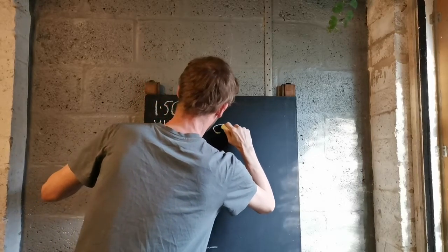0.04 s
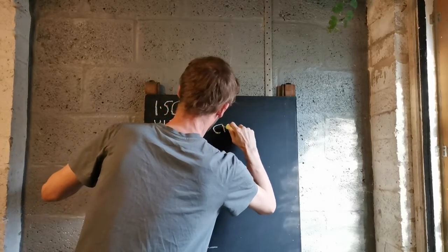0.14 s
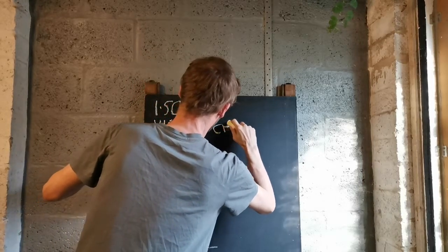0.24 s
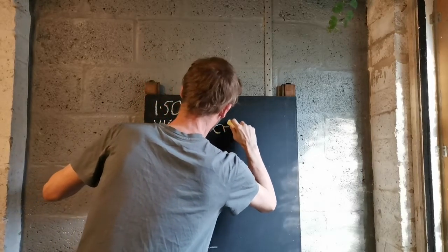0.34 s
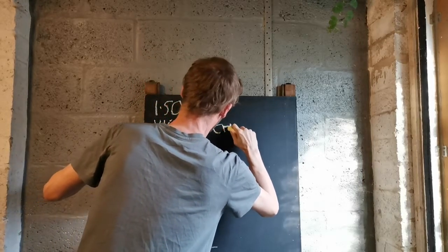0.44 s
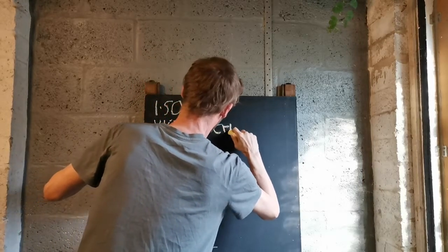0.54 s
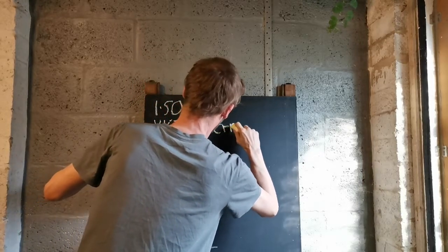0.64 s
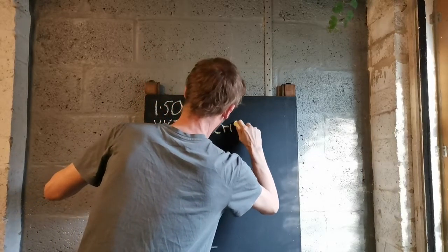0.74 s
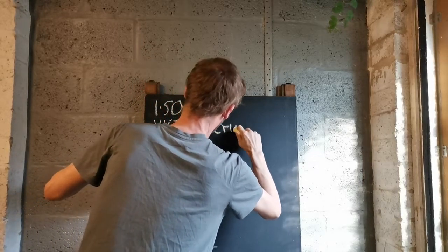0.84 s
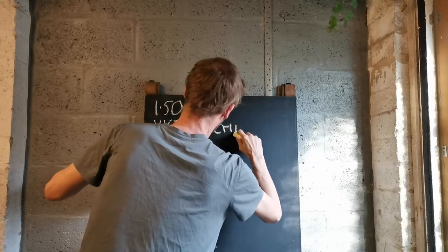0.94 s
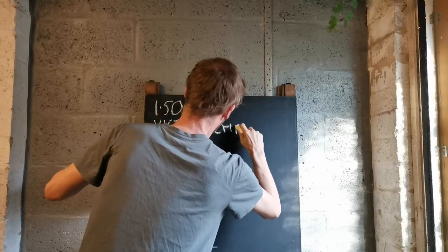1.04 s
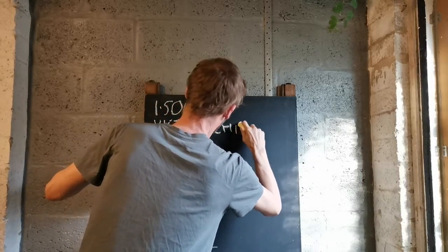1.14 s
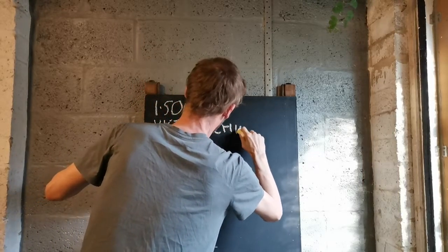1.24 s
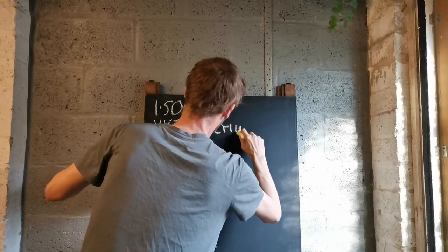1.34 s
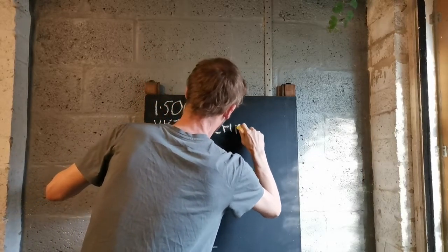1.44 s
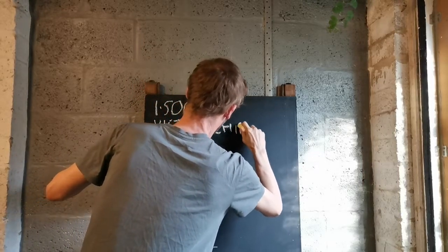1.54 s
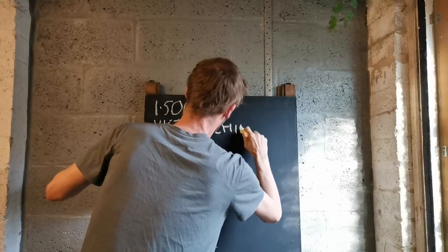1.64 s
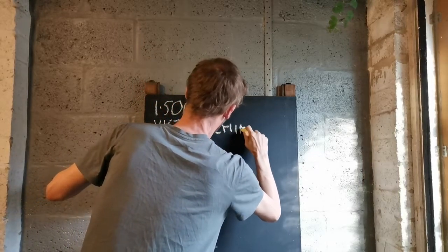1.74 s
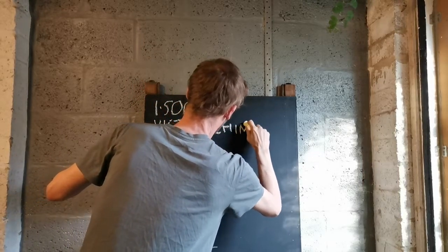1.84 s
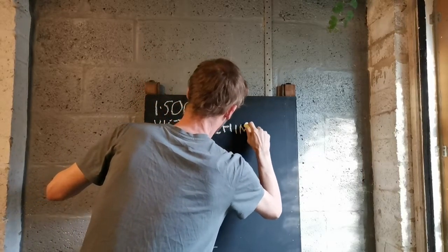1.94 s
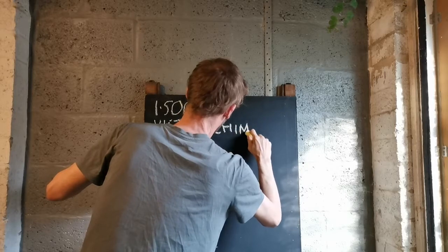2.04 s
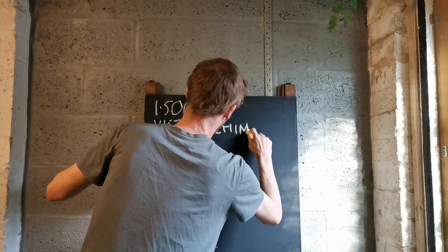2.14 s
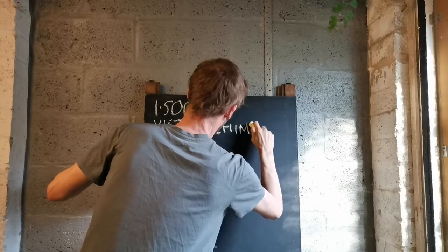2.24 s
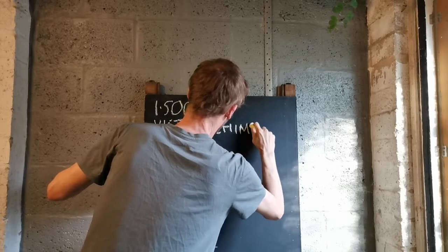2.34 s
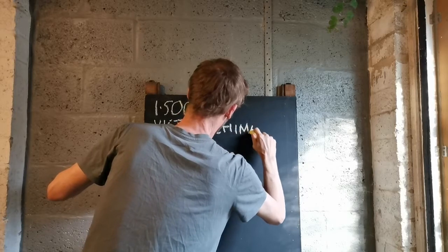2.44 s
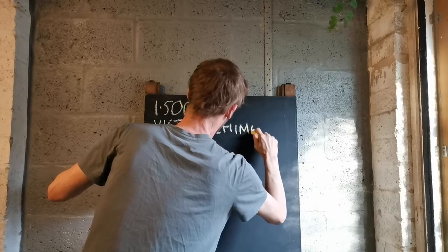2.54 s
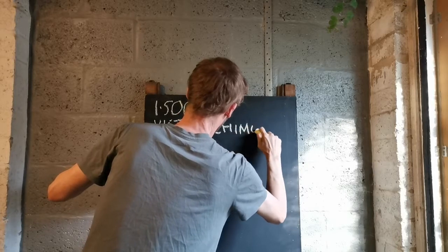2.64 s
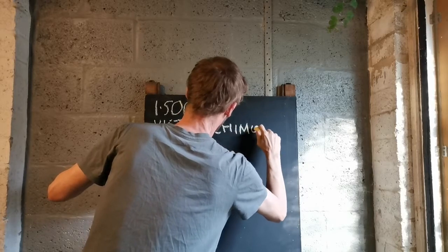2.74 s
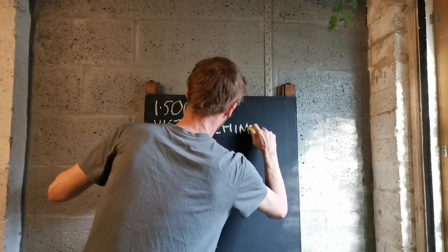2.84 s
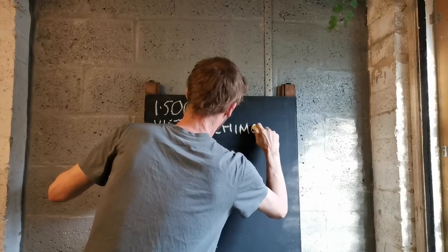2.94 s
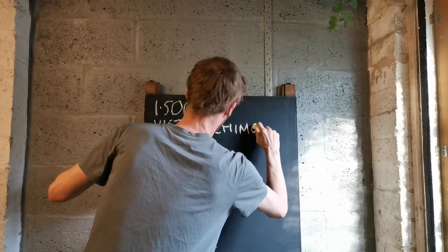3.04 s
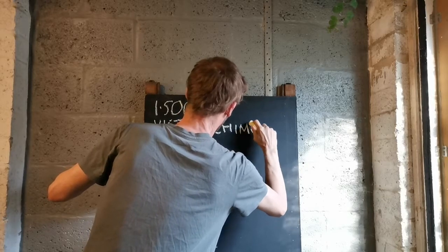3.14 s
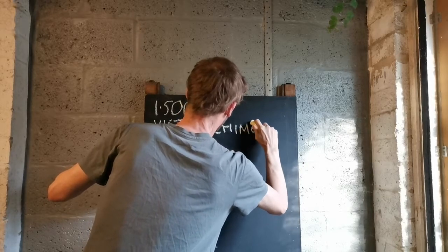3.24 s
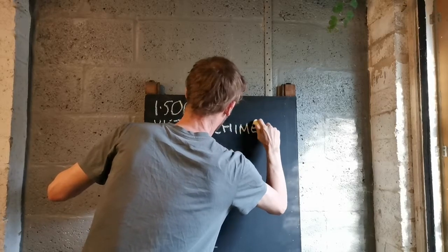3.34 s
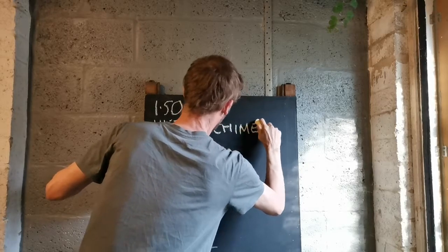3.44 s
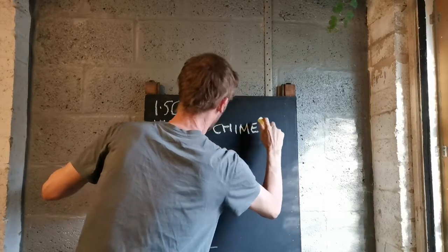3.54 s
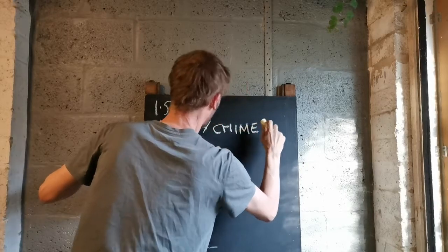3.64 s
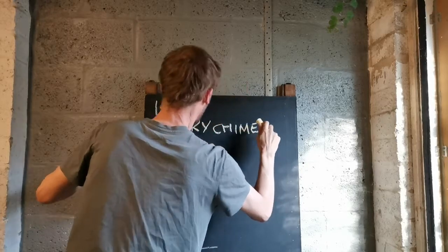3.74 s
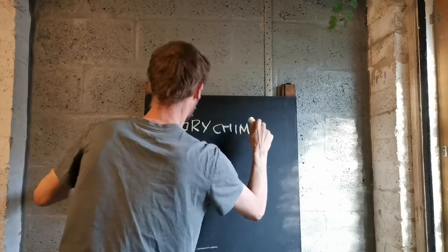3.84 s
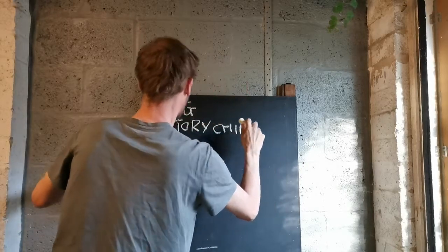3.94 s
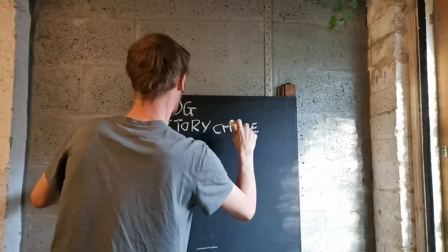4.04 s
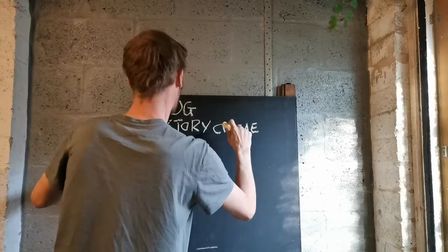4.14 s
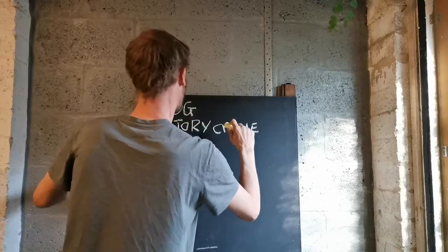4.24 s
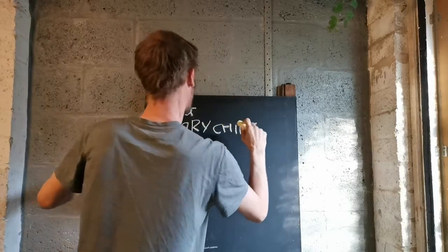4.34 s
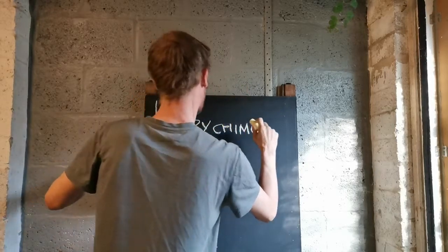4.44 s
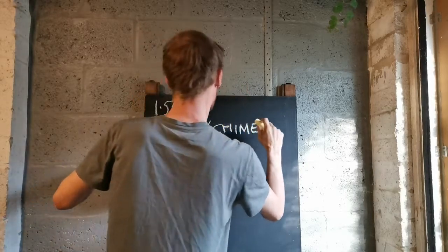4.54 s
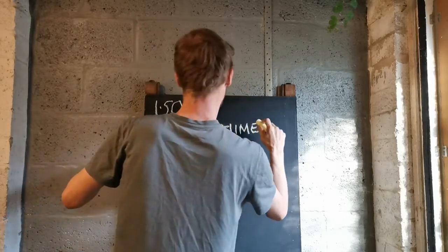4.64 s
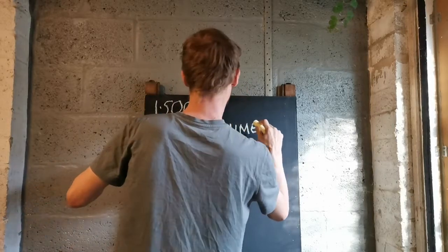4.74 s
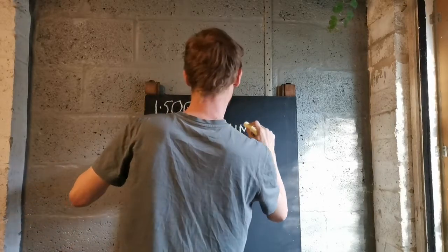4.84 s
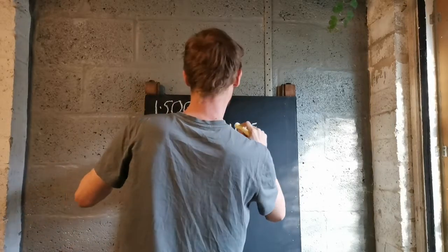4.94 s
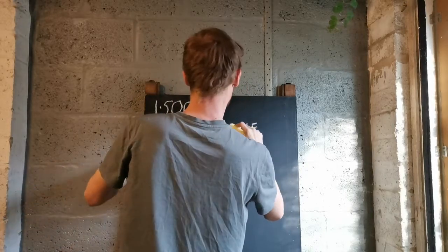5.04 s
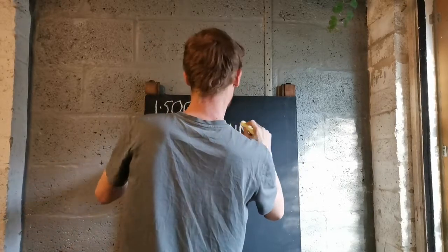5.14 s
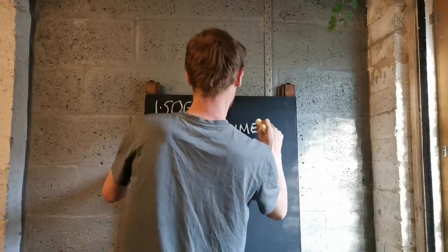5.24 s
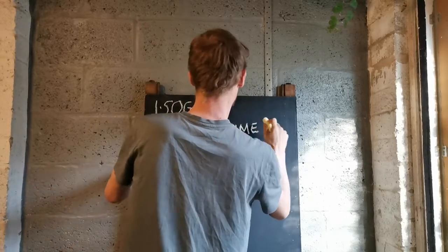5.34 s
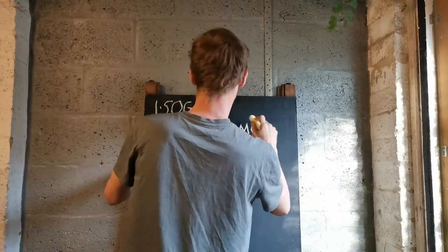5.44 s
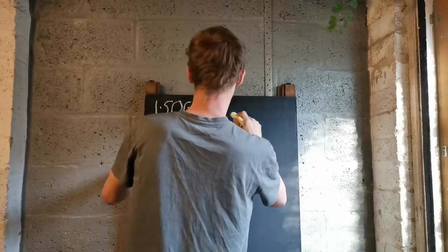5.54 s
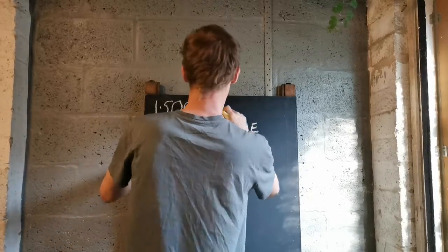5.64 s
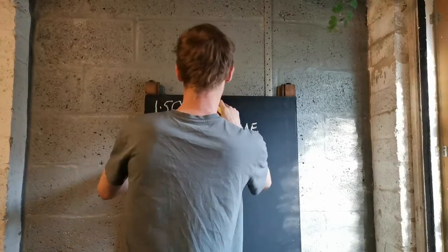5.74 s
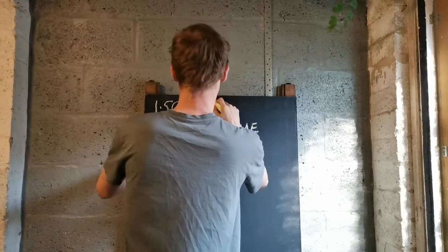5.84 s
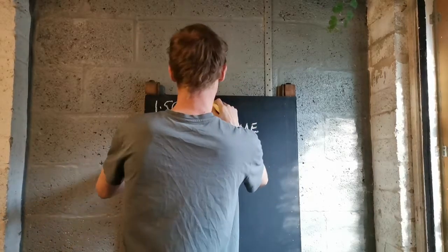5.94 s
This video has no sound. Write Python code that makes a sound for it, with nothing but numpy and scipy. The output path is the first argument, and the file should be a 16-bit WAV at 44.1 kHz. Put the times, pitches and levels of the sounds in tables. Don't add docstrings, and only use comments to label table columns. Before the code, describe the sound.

Chalk knocks and scrapes out letters on a thin wooden blackboard in a small bare room, then feet shuffle and a hand softly bumps the board.

```python
import sys
import numpy as np
from scipy import signal
from scipy.fft import rfft, irfft
from scipy.io import wavfile

SR = 44100
rng = np.random.default_rng(int(sys.argv[2]) if len(sys.argv) > 2 else 0)


def materialize(psi):
    bounded = np.clip(np.atleast_2d(psi).T, -1, 1)
    quanta = np.round(bounded * 32767).astype(np.int16)
    wavfile.write(sys.argv[1], SR, quanta)


def makeup_ratio(level_db):
    decades = np.asarray(level_db, float) / 20
    return 10 ** decades


N = 265041


def evened(x):
    return x / np.sqrt(np.mean(x ** 2) + 1e-20)


def read(points, hz):
    f, value = np.transpose(points)
    return np.interp(np.log(hz + 1), np.log(f + 1), value)


def add(mix, start_s, sound):
    part = mix[:, round(start_s * SR):][:, :sound.shape[1]]
    part += sound[:, :part.shape[1]]


def band(x, lo_hz, hi_hz):
    sos = signal.butter(3, [lo_hz, hi_hz], "band", fs=SR, output="sos")
    return signal.sosfilt(sos, x)


def colour(x, points):
    level_db = np.maximum(read(points, abs(np.fft.fftfreq(4096, 1 / SR))), -90)
    log_gain = level_db * np.log(10) / 20
    taps = np.fft.ifft(np.exp(np.conj(signal.hilbert(log_gain)))).real[:2048]
    taps = taps.reshape((1,) * (x.ndim - 1) + (-1,))
    return signal.oaconvolve(x, taps, axes=-1)[..., :x.shape[-1]]


def resonate(x, hz, width_hz):
    turn = np.exp(2j * np.pi * np.cumsum(hz * np.ones(len(x))) / SR)
    r = np.exp(-np.pi * width_hz / SR)
    smooth = signal.lfilter([1 - r], [1, -r], x / turn + 1e-18)
    return 2 * (turn * smooth).real


def wander(per_s):
    knots = rng.uniform(-1.7, 1.7, 200)
    return np.interp(np.arange(N) / SR * per_s, np.arange(len(knots)), knots)


def grit(per_s, spread_db):
    size = makeup_ratio(spread_db * np.minimum(rng.exponential(1, N), 4))
    size = size * rng.choice([-1., 1.], N)
    return evened(size * (rng.random(N) < per_s / SR))


def swells(peak_s, rise_s, fall_s, peak_db, edge_db, shape):
    t = np.arange(0, N + 32, 32) / SR - np.array(peak_s)[:, None]
    rise_s = np.abs(np.reshape(rise_s, (-1, 1)))
    fall_s = np.abs(np.reshape(fall_s, (-1, 1)))
    away = np.where(t < 0, -t / rise_s, t / fall_s)
    return makeup_ratio(np.maximum(np.array(peak_db)[:, None] - edge_db * away ** shape, -200))


def blended(gains, *columns):
    power = (gains ** 2).sum(0)
    curves = [np.sqrt(power)]
    curves += [np.dot(column, gains ** 2) / power for column in columns]
    return [np.interp(np.arange(N) / 32, np.arange(len(power)), curve) for curve in curves]


# freq_hz, likeness [0..1]
LIKENESS = [(60, 0.15), (150, 0.66), (380, 1), (950, 0.26), (2380, 0.017), (5980, 0.0083), (15000, 0.01)]


def port_noise(size):
    a, b = rfft(rng.standard_normal((2, size)))
    same = np.clip(read(LIKENESS, np.fft.rfftfreq(size, 1 / SR)), 0, 1)
    return irfft([a, same * a + np.sqrt(1 - same ** 2) * b], size)


# freq_hz, t60_s
DECAY = [(150, 0.29), (600, 0.16), (1500, 0.22), (3000, 0.14), (6000, 0.19)]


def tail(stretch, size=16384):
    hz, t = np.fft.rfftfreq(size, 1 / SR), np.arange(size) / SR
    spectrum = rfft(port_noise(size))
    out = np.zeros((2, size))
    for k, (_, t60_s) in enumerate(DECAY):
        share = read([(f, float(j == k)) for j, (f, _) in enumerate(DECAY)], hz)
        out += irfft(spectrum * share, size) * makeup_ratio(-60 * t / (t60_s * stretch))
    return out / np.linalg.norm(out[0])


def in_room(x, direct_db, stretch):
    turn = 2 * np.pi * 4 * np.arange(N) / SR
    shares = np.sqrt(2 / 3) * np.cos(turn + 2 * np.pi / 3 * np.arange(3)[:, None])
    dense = sum(signal.oaconvolve((x * share)[None], tail(stretch), axes=1)[:, :N] for share in shares)
    return makeup_ratio(direct_db) * x + dense


# freq_hz, density_db [dB per Hz]
FLOOR_SPECTRUM = [(18, -18.5), (30, 5.5), (165, -8.5), (264, -10), (550, -16), (1150, -16.5), (1750, -22.5),
                  (4860, -28.5), (6900, -35.5), (9100, -49.5), (10100, -50.5), (12500, -52), (12900, -29.5),
                  (15800, -40.5)]


def room_floor():
    noise = 0.16 * port_noise(N) + rng.standard_normal((2, N))
    return makeup_ratio(-58.5) * evened(colour(noise, FLOOR_SPECTRUM))


# peak_s, low_modes_db, sway_db
ROCKS = [(0.003, -44.5, -46), (0.17, -37, -43), (0.57, -37, -46), (0.92, -40, -47.5), (1.391, -41.5, -44.5),
         (1.64, -44, -53.5), (1.99, -46, -52.5), (2.3, -47, -68.5), (2.54, -38.5, -46), (3.16, -43.5, -45),
         (3.39, -39.5, -50.5), (3.75, -66, -59.5), (4.74, -63.5, -59), (4.93, -56.5, -60), (5.16, -73, -62),
         (5.5, -78, -63), (5.96, -40, -61)]


def rocking():
    peak_s, low_db, sway_db = np.transpose(ROCKS)
    rise_s, fall_s, edge_db, shape = 0.12, 0.29, 17, 1.1
    (lean,) = blended(swells(peak_s, rise_s, fall_s, low_db, edge_db, shape))
    (swing,) = blended(swells(peak_s, rise_s, fall_s, sway_db, edge_db, shape))
    push = rng.standard_normal((3, N))
    low = resonate(resonate(push[0], 132, 25), 133.7, 40)
    low += makeup_ratio(-4) * resonate(resonate(push[0], 242, 19), 210, 55)
    sway = np.array([resonate(resonate(push[0] + 0.6 * p, 42, 30), 42, 45) for p in push[1:]])
    return lean * evened(low) + swing * makeup_ratio(-3) * evened(sway)


# freq_hz, level_db, t60_s
BOARD_MODES = [(126, -10, 0.43), (238.8, -1.5, 0.17), (351.7, -2, 0.13), (497.4, 1, 0.14), (628, -1, 0.15),
               (974, -4, 0.16), (1190, -4.5, 0.098), (1253, -16, 0.21)]
# freq_hz, density_db [dB per Hz]
BLOW_SPECTRUM = [(47, -22.5), (80, -7.5), (278, -2.5), (412, -8), (555, 3.5), (717, 1), (1090, -0.5),
                 (1550, -6), (2860, -20), (4600, -21.5), (5280, -33), (6560, -30), (9000, -47.5),
                 (11700, -87.5), (19800, -120)]


def knock(peak_db, contact_ms, low_db, crack_db, ring):
    t = np.arange(16384) / SR
    spot = rng.standard_normal((len(BOARD_MODES), 2))
    modes = np.zeros((2, len(t)))
    for (hz, db, t60_s), (share, skew) in zip(BOARD_MODES, spot):
        level_db = db + 2.4 * share + low_db * (hz < 300)
        phase = 2 * np.pi * hz * t + np.array([[0], [skew * hz / 1100]])
        modes -= makeup_ratio(level_db - 60 * t / (t60_s * ring)) * np.sin(phase)
    tilt = [(f, db + crack_db * np.clip(np.log2(f / 1300) * 2, 0, 2)) for f, db in BLOW_SPECTRUM]
    dense = colour(tail(ring), tilt)
    sound = dense / np.linalg.norm(dense) + makeup_ratio(-2) * modes / np.linalg.norm(modes)
    sound *= 1 - np.exp(-t / 0.0005)
    sound *= 1 + 0.41 * np.exp(-t / 0.015)
    push = np.sin(np.pi * np.clip(t[:400] * 1000 / contact_ms, 0, 1)) ** 2
    sound = signal.oaconvolve(sound, push[None], axes=1)
    sound = band(sound, 140, 15000)
    return makeup_ratio(peak_db) * sound / np.sqrt(2 * np.mean(sound[:, :600] ** 2))


# start_s, peak_db, contact_ms, low_modes_db, crack_db
LANDINGS = [
    (0.098, -13.5, 0.38, 10.5, 0),
    (0.466, -9, 0.2, 7.5, 3.5),
    (0.859, -12.5, 0.68, 3.5, 1),
    (1.248, -13.5, 0.25, 7, -9),
    (2.405, -9, 0.26, -4, 5.5),
    (2.968, -9, 0.18, -5, 4),
    (3.314, -10, 0.24, -5, 6.5),
]


def landings():
    mix = np.zeros((2, N))
    for start_s, *blow in LANDINGS:
        add(mix, start_s + 0.0004, knock(*blow, ring=1.267))
    return mix


# fastest_s, length_s, hiss_db [speed], drone_over_hiss_db [pressure], deep_modes_db [slant]
SWEEPS = [(0.212, 0.18, -45, 7.5, -1), (0.57, 0.19, -45.5, 5, 0), (0.97, 0.19, -43.5, 6, -5),
          (1.354, .17, -42, 4.5, -2.5), (1.552, 0.23, -47, 7.5, 5), (1.732, 0.19, -42.5, 5, -9),
          (1.921, 0.19, -42.5, 9, 1.5), (2.121, 0.18, -40, 4, -0.7), (2.245, .14, -64.5, 9.5, 3.5),
          (2.518, 0.24, -46.5, 2.5, 2.5), (2.755, 0.14, -45.5, 6.5, -2), (2.813, 0.11, -60, 12, 8.5),
          (3.064, 0.15, -51.5, 7, 4), (3.406, 0.15, -53.5, 9, -2), (3.523, 0.11, -66.5, 11.5, 3)]
SKID_PEAKS = [
    -53,
    -45,
    -44,
    -58,
    -49.5,
    -40.5,
    -43,
]
# freq_hz, density_db [dB per Hz]
HISS_SPECTRUM = [(880, -32), (1500, -2), (1620, 0.5), (3470, -7), (4480, -8.5), (5510, -16), (6510, -13.5),
                 (9370, -23.5), (10100, -35.5), (13400, -37), (15800, -34)]
# freq_hz, width_hz, level_db
STICK_MODES = [(3900, 120, -24), (6430, 70, -23)]
# freq_hz, width_hz, level_db
DRONE_MODES = [(352.8, 32, -6.5), (509, 29, -1), (796, 69, -3.5), (1161, 46, -3), (1357, 82, -2.5),
               (1894, 120, -18.5)]


def strokes():
    fastest_s, length_s, hiss_db, drone_db, deep_db = np.transpose(SWEEPS)
    land_s = np.transpose(LANDINGS)[0]
    slowing = 1.154
    sweeps = swells(fastest_s, length_s / 2, slowing * length_s / 2, hiss_db, edge_db=21, shape=1.65)
    skids = swells(land_s + 0.0044, 0.0011, 0.06, SKID_PEAKS, edge_db=18, shape=0.84)
    skid_drone_db, skid_deep_db = 5.5 + 0 * land_s, 3 + 0 * land_s
    speed, drone_db, deep_db = blended(np.vstack([sweeps, skids]), np.r_[drone_db, skid_drone_db],
                                       np.r_[deep_db, skid_deep_db])
    slips, chatter = grit(7700, 1.9), grit(2000, 5.8)
    hiss = evened(colour(slips, HISS_SPECTRUM))
    for hz, width_hz, db in STICK_MODES:
        squeak = evened(resonate(resonate(chatter, hz, width_hz), hz, 3 * width_hz))
        hiss += makeup_ratio(db + 3 * wander(36)) * squeak
    drone = np.zeros(N)
    for hz, width_hz, db in DRONE_MODES:
        share_db = db + 2.5 * wander(8) + deep_db * (hz < 700)
        drone += makeup_ratio(share_db) * evened(resonate(resonate(slips, hz, 3.2 * width_hz), hz, 4.2 * width_hz))
    return in_room(speed * (makeup_ratio(4) * hiss + makeup_ratio(drone_db) * drone), -14, 0.56)


# heaviest_s, rise_s, fall_s, weight_db, grit_over_weight_db
DRAGS = [(3.694, .004, 0.095, -48.5, -15.5), (3.732, 0.013, 0.07, -34, -20), (3.85, 0.055, 0.12, -68.5, 0),
         (4.0, 0.13, 0.19, -74.5, 5.5), (4.104, 0.017, 0.061, -56.5, -9.5), (4.351, 0.01, 0.094, -43.5, -6),
         (4.41, 0.084, 0.084, -47, -10.5), (4.461, 0.0087, 0.054, -51, -3.5),
         (4.52, 0.077, 0.098, -68.5, 6.5), (4.726, 0.1, 0.31, -63.5, -4), (4.862, 0.01, 0.032, -56.5, -19),
         (4.911, 0.078, .04, -44, -18), (4.932, 0.0083, 0.12, -35.5, -6.5), (4.983, 0.051, 0.077, -37, -19),
         (5.25, 0.16, 0.29, -64.5, -18), (5.771, 0.003, 0.088, -53.5, -15.5),
         (5.9, 0.032, 0.12, -43.5, -35)]
# at_s, hollow_hz, overtone_db, dust_over_scuff_db
GROUND = [
    (3.7, 557, -20, -9),
    (3.739, 300, -9.5, -10.5),
    (4.1, 420, -1, -2),
    (4.36, 239, -2.5, 1),
    (4.47, 227, -5, 0),
    (4.87, 446, -9, -3),
    (4.96, 400, 0, -29),
    (5.3, 1200, -5, -4),
    (5.85, 479.4, -15, -6),
]


def shuffles():
    heaviest_s, rise_s, fall_s, weight_db, grit_db = np.transpose(DRAGS)
    drags = swells(heaviest_s, rise_s, fall_s, weight_db, edge_db=23.5, shape=1.12)
    weight, scuff_db = blended(drags, grit_db)
    at_s, *ground = np.transpose(GROUND)
    hollow_hz, over_db, dust_db = (np.interp(np.arange(N) / SR, at_s, column) for column in ground)
    slips = grit(2500, 6)
    hollow = resonate(resonate(slips, hollow_hz, 300), hollow_hz, 760)
    lump = evened(band(hollow, 95, 1600))
    lump += makeup_ratio(over_db) * evened(band(grit(2200, 4.3), 600, 1180))
    scuff = evened(band(grit(3000, 5.5), 1100, 3180))
    dust = evened(band(grit(6000, 0.88), 1730, 7160))
    return in_room(weight * (lump + makeup_ratio(scuff_db) * (scuff + makeup_ratio(dust_db) * dust)), -9.5, 0.3)


# start_s, peak_db, low_modes_db, crack_db
SOFT_BUMPS = [
    (3.695, -39, -17, -20.5),
    (3.727, -33, 7, -15),
    (4.095, -62.5, 4.5, 3),
    (5.77, -50.5, 17, -32),
    (5.859, -22, 15.5, -13),
    (5.88, -23.5, 13.5, -13),
]


def bumps():
    mix = np.zeros((2, N))
    for start_s, peak_db, low_db, crack_db in SOFT_BUMPS:
        add(mix, start_s + 0.00025, knock(peak_db, 2.13, low_db, crack_db, ring=1))
    return mix


def scene():
    return room_floor() + rocking() + landings() + strokes() + shuffles() + bumps()


# freq_hz, left_minus_right_db
PORT_LEAN = [(60, 0.0), (150, -2.5), (380, -3.5), (950, -1.5), (2380, -2.5), (5980, 1.0), (15000, 6.0)]


def port_colour(dry):
    lean_db = read(PORT_LEAN, np.fft.rfftfreq(N, 1 / SR)) / 2
    return irfft(rfft(dry) * makeup_ratio([lean_db, -lean_db]), N)


def roll_off(x):
    return signal.sosfilt(signal.butter(12, 15770, fs=SR, output="sos"), x)


def record(dry):
    limited = np.tanh(port_colour(dry) / 1.15) * 1.15
    return roll_off(limited)


dry = scene()
out = record(dry)
materialize(out)
```